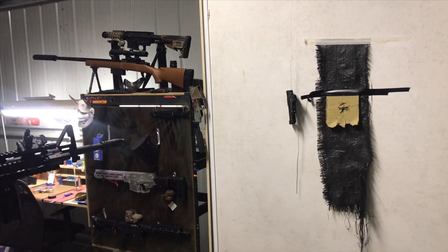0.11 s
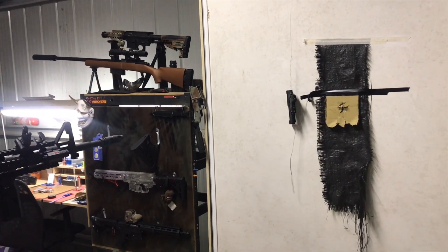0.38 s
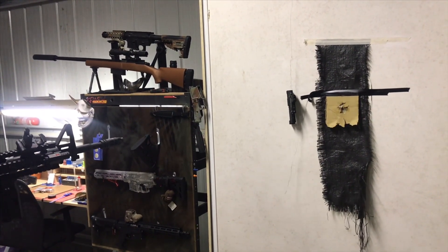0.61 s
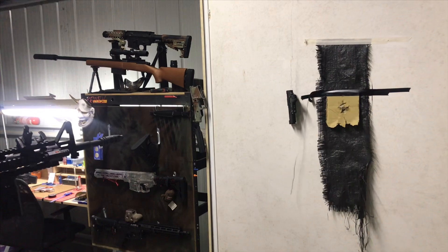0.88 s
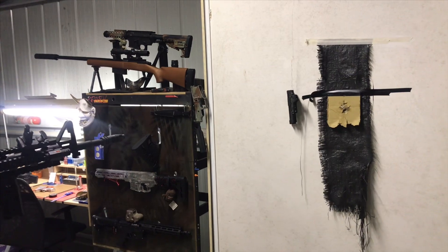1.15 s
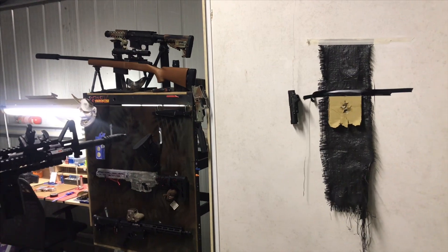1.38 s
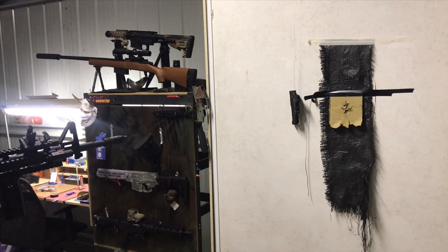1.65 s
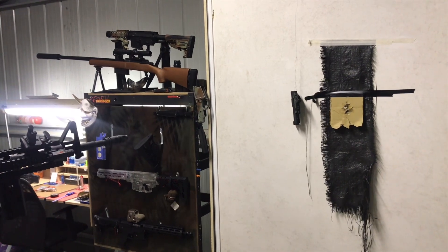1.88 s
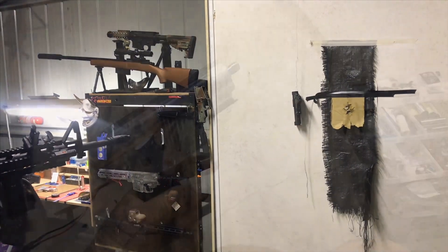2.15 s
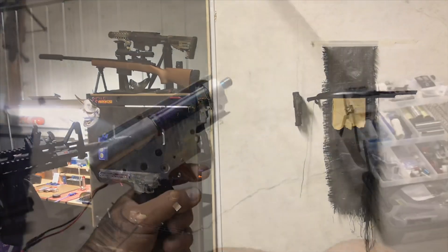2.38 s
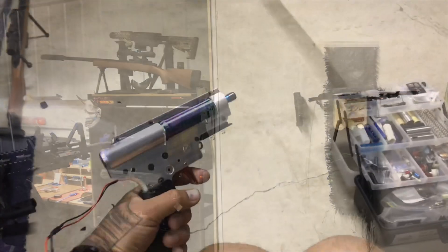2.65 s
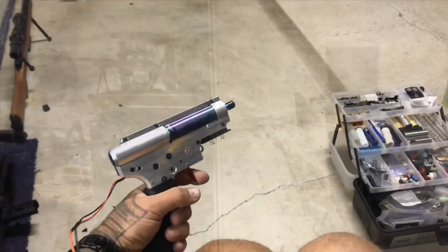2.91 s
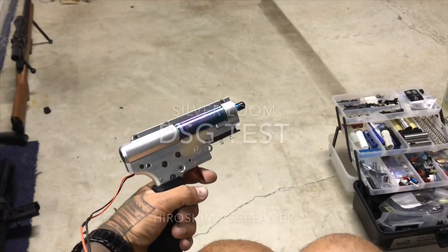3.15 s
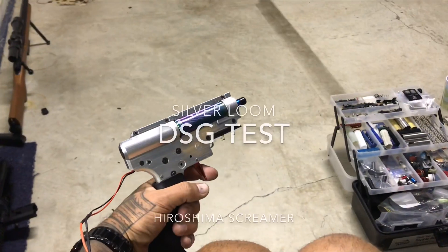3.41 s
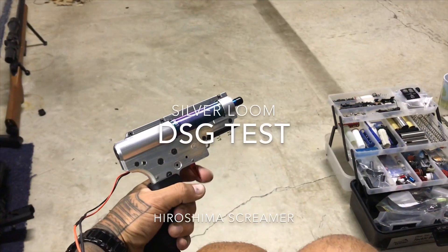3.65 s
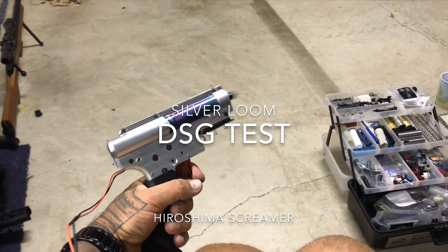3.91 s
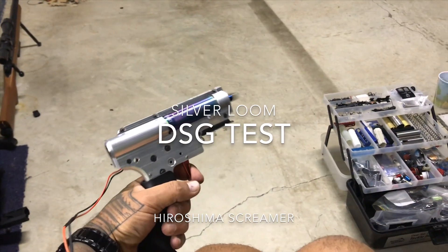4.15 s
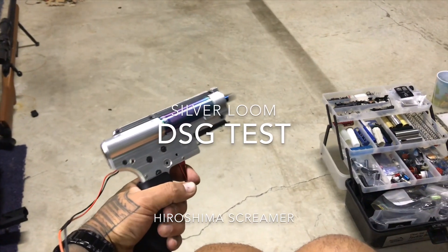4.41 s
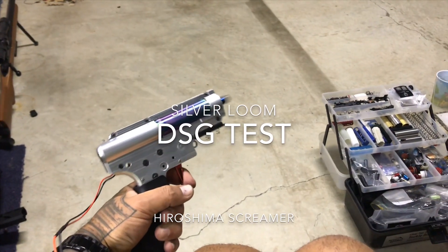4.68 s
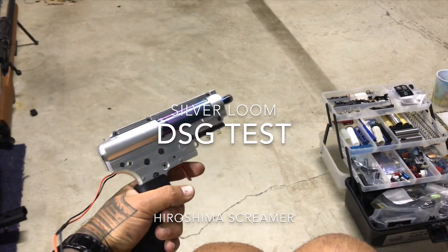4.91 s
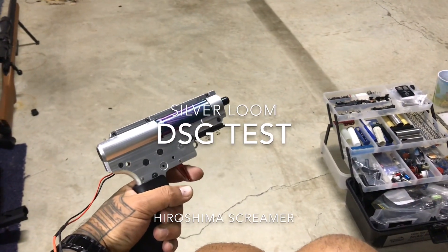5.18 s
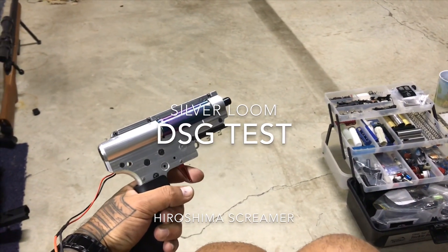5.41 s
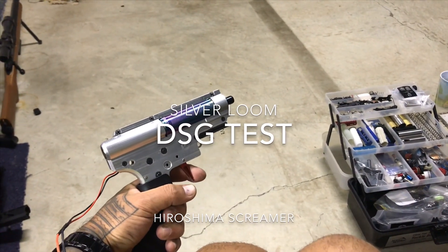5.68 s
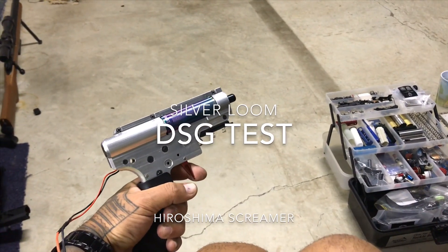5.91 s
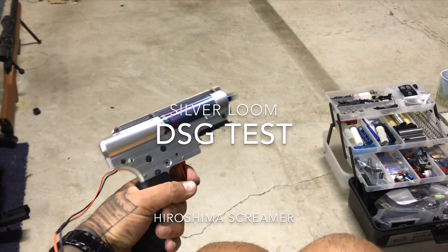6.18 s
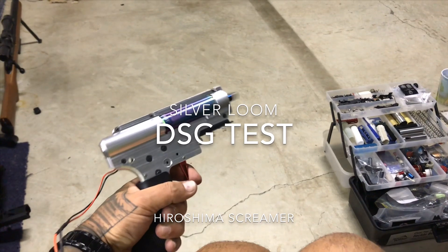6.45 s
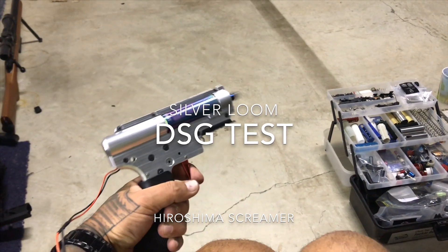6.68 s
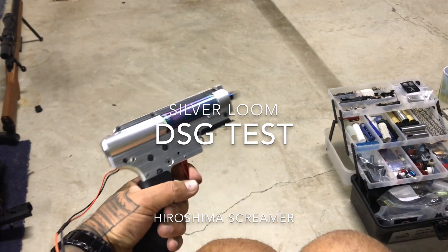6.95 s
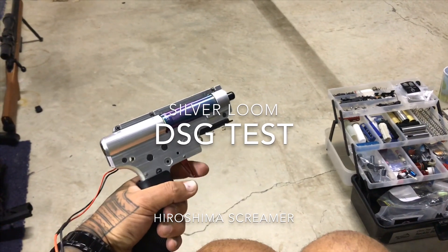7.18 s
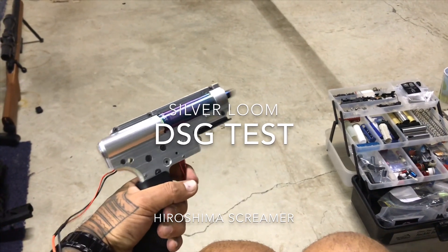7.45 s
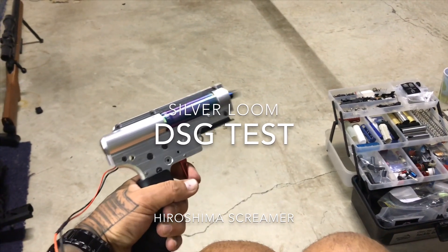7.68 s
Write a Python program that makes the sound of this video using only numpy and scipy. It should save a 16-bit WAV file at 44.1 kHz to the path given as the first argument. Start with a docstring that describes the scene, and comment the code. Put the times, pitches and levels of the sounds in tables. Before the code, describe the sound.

Rapid mechanical popping bursts echo and turn uneven before fading; then a close, bright metal gearbox clatters in three quicker bursts with reverberant tails.

```python
"""An airsoft gun fires bursts in a hard workshop, over a low drone and the room's rumble.
It fades out, and then a bare gearbox is fired in the hand, nearer. Each blow rings the body as
damped sines and cracks as short noise, and gear teeth clatter as random ticks. The nozzle's air
puffs sometimes thump the microphone, small clicks are scattered about, and the room rings on
after each burst as a fading tail of noise."""
import sys
import numpy as np
from scipy import signal
from scipy.fft import rfft, irfft, next_fast_len
from scipy.io import wavfile

SR = 44100
rng = np.random.default_rng(int(sys.argv[2]) if len(sys.argv) > 2 else 0)


def invert_db(level):
    """Linear amplitude ratio for a level in decibels (20 dB per decade), elementwise."""
    return 10 ** (np.asarray(level, dtype=float) / 20)


def pcm_store(signal):
    """Save signal as 16-bit PCM."""
    levels = np.round(np.clip(np.atleast_2d(signal), -1, 1) * 32767)
    wavfile.write(sys.argv[1], SR, levels.astype(np.int16).T)


N = 344862
T = np.arange(N) / SR  # time of every sample, in seconds

# What a blow rings, as damped tones: pitch_hz, relative level_db, t60_s (time to fall by 60 dB)
GUN_BODY_MODES = [(140, -16.5, 0.035), (222, -12, 0.078), (362, -1.5, 0.029), (501, -7, 0.067),
                  (618, -4, 0.11), (660, -5, 0.042), (840, 3.5, 0.023)]
GUN_MUZZLE_MODES = [(1600, -2, .014), (1760, 0, .018), (2150, -3, .016), (2500, -8, .01)]
SHELL_MODES = [(630, -17, .011), (1100, 0, .009), (1560, -1, .009), (2600, -6, .004), (3300, -7, .006)]
GRIP_MODES = [(150, -2.5, 0.015), (242, -1, 0.029), (307, -1, 0.028), (400, -1.5, 0.021),
              (494, -0.5, 0.028), (600, 0, 0.028), (775, 2, 0.013)]  # the held frame, which answers every slam alike
# Cracks within one cycle of the gears: delay_s, level_db relative to the blow, t60_s
GUN_CRACKS = [(.0015, -14.5, 0.0052), (.003, -2, 0.091), (.0075, -8.5, 0.015), (0.012, -12.5, .008),
              (.02, -11.5, .008)]
BOX_CRACKS = [(-.001, -5, 0.0029), (0.0001, -11, 0.0096), (.003, -14.5, 0.023), (0.0119, -18, .01),
              (.014, -17, 0.011)]
# The same pattern of rebounds goes with every blow: delay_s, level_db relative to the blow
GUN_REBOUNDS = [(0, 3), (.0065, -24), (.017, -17)]
BOX_REBOUNDS = [(-.0006, 1.5), (.0025, -12.5), (.0045, -10), (.007, -16.5), (.0098, -5.5), (0.0125, -24),
                (0.015, -6)]
# Colour of the cracks and gear clatter: pitch_hz, relative level_db (per Hz)
GUN_TONE = [(100, -34), (300, -19), (620, -10), (1060, -14), (1760, -8), (2580, -10), (3470, -9),
            (6990, -13), (10500, -17), (12700, -18), (16000, -21)]
BOX_TONE = [(200, -42), (500, -27), (800, -18), (1140, -10), (1600, -11), (2100, -9), (3030, -6),
            (4990, -9), (6200, -8), (7690, -9), (11000, -11), (16000, -13)]
# Colour of the gun burst that ends as the sound opens: pitch_hz, relative level_db (per Hz)
EARLIER_TONE = [(59, -47), (100, -25.5), (452, -10), (492, -13.5), (662, -7.5), (1010, -12), (2270, -5.5),
                (6560, -11), (16000, -20.5)]

# Bursts: motor_on_s, first_blow_s, trigger_released_s, number of blows, gear sector of the first blow
GUN_BURSTS = [(.441, .4648, 1.439, 37, 0), (1.984, 2.0205, 2.135, 6, 0), (2.412, 2.4285, 3.2, 5, 0)]
BOX_BURSTS = [(3.809, 3.8213, 4.909, 59, 0), (6.094, 6.1002, 7.115, 53, 0), (7.510, 7.5231, 7.9, 15, 1)]
# Pace: steady_gap_ms, extra_first_gap_ms, share of the extra left after each blow, second_sector_late_ms
GUN_CADENCE = (28.435, 12.1, .28, 0)
BOX_CADENCE = (19.832, 16.3, .23, .17)
# The motor labours for a while: start_s, extra_gap_ms
MOTOR_SAG = [(6.42, 0), (6.52, 1.155), (6.58, .57), (6.71, .858), (6.81, 1.335), (6.94, 1.215), (7.0, .303),
             (7.1, .119), (7.3, 0)]
# Steady gun shots whose pop is weak: shot number, counted from 0
MUFFLED_SHOTS = [0, 4, 6, 10, 11, 17, 19, 24, 26, 32, 35, 36, 37, 39, 42]
# The last gun burst turns uneven: start_s, muzzle pop level_db
UNEVEN_SHOTS = [(2.609, -17), (2.6566, -18), (2.6909, -6), (2.7217, -5), (2.756, -11.5), (2.801, -15.5),
                (2.8436, -3.5), (2.8848, -10), (2.927, -6), (2.9518, -18.5), (2.9876, -16.5),
                (3.0231, -10.5), (3.054, -10)]
# Gear noise of a burst: surge_db, running_db, last_db
GUN_GEAR_DB = (-14.5, -20, -19)
BOX_GEAR_DB = (-10.5, -17, -22)
# Its timing: surge_s and settle_s after motor on, run_down_s after release, then stop_s
GUN_GEAR_S = (.11, .33, .085, .04)
BOX_GEAR_S = (.085, .19, .07, .05)

# Extra thuds of the gun's body, then of the gearbox shell, among them a first-shot thud
# and coasting rebounds: start_s, level_db
EXTRA_THUDS = [(.461, -10), (1.535, -13.5), (2.195, -13), (3.829, 9), (4.992, -13), (5.028, -24.5),
               (5.049, -18.5), (5.056, -17), (7.159, -26), (7.212, -16)]
# Trigger, grip and motor-start clicks: start_s, level_db, pitch_hz around which the click lies
CLICKS = [(.4525, -10.5, 2970), (2.0115, -11.5, 3280), (2.4185, -19.5, 3330), (3.205, -49.5, 400),
          (3.56, -72.5, 2500), (3.63, -49, 600), (3.651, -43, 353), (3.654, -55.5, 1660),
          (3.762, -59.5, 3500), (3.773, -46, 5000), (3.798, -38.5, 1270), (3.799, -48, 4990),
          (6.053, -60, 4000), (6.063, -44.5, 4820), (7.5195, -24.5, 2420)]
# Air puffs that reach the microphone: start_s, level_db
PUFFS = [(3.9012, -27), (3.9432, -22), (4.0418, -27), (4.1012, -28), (4.1389, -12), (4.2994, -28),
         (4.3371, -26), (4.3768, -29), (4.3985, -27), (4.4164, -21), (4.5772, -31), (4.5968, -30),
         (4.6547, -30), (4.893, -26), (4.936, -27), (6.2201, -22), (6.2598, -30), (6.321, -14),
         (6.3797, -26), (7.019, -29), (7.0393, -30), (7.6423, -28), (7.6645, -22), (7.744, -27),
         (7.8015, -24)]

# How long the room rings: pitch_hz, t60_s
ROOM_RING = [(120, 1.5), (300, 1), (700, 1.34), (1500, 1.265), (3000, 1.227), (6000, 1.096), (10000, 0.73),
             (15000, 0.42)]
# Level of the gun scene: time_s, level_db
FADE = [(2.25, 2), (2.5, -3), (2.8, -7.5), (3.0, -17), (3.06, -24.5), (3.1, -56), (3.11, -97.5)]
# Colour of the room's rumble: pitch_hz, relative level_db (per Hz)
RUMBLE_TONE = [(15, -38), (25, 1), (114, -10), (200, -14), (270, -18), (489, -32.5), (1190, -37.5),
               (1740, -54), (5000, -55), (12200, -66.5), (16000, -73.5)]
# How the rumble's level moves: time_s, relative level_db
RUMBLE_LEVEL = [(0, -4.5), (3.1, -2.5), (3.5, 2), (5.1, -15), (5.6, -3.5), (6.0, -1), (7.3, -21.5),
                (7.82, -7.5)]
# Low drone of the gun scene: pitch_hz, level_db, width_hz
DRONE_BANDS = [(51.5, -63, 20), (106, -53, 45), (197, -62.5, 60)]
# Dips in the microphone's treble: pitch_hz, width_hz, level_db
MIC_DIPS = [(5090, 670, -2.5), (7520, 650, -4.5), (10540, 620, -5)]

SCENE_SWITCH_S = FADE[-1][0]  # gun before, gearbox after


def evened(x):
    """Scales a sound to an average strength (rms) of 1."""
    return x / np.sqrt(np.mean(x ** 2) + 1e-20)


def curve(rows):
    """Draws a gain over time through rows of time and dB."""
    return invert_db(np.interp(T, *np.transpose(rows)))


def coloured(x, points):
    """Filters noise to a spectrum whose own mean power is 1."""
    size = next_fast_len(len(x))
    f, db = np.transpose(points)
    log_hz = np.log(np.fft.rfftfreq(size, 1 / SR) + 1)
    shape = invert_db(np.interp(log_hz, np.log(f + 1), db))
    return irfft(rfft(x, size) * evened(shape), size)[:len(x)]


def train(s, db):
    """Places a one-sample click at each time."""
    out = np.zeros(N)
    place = np.clip(np.round(np.asarray(s) * SR).astype(int), 0, N - 1)
    np.add.at(out, place, invert_db(db))
    return out


def ring(modes, rise_s):
    """A struck body: damped sines, neighbours out of phase, with a peak of 1."""
    t = np.arange(SR // 5) / SR
    out = np.zeros(len(t))
    for k, (hz, db, t60) in enumerate(modes):
        out += (-1) ** k * invert_db(db - 60 * t / t60) * np.sin(2 * np.pi * hz * t)
    out *= 1 - np.exp(-t / rise_s)  # the contact takes a moment
    return out / abs(out).max()


def room(x, wet_db):
    """The direct sound plus a tail of noise whose pitch bands die away at their own speed."""
    hz, t, noise = signal.stft(rng.standard_normal(2 * SR), SR, nperseg=512)
    f, t60 = np.transpose(ROOM_RING)
    decay = invert_db(-60 * t / np.interp(hz, f, t60)[:, None])
    tail = signal.istft(noise * decay, SR, nperseg=512)[1]
    # first reflections come a few ms late
    tail *= np.clip(np.arange(len(tail)) / SR / 0.0089 - .3, 0, 1)
    tail /= np.linalg.norm(tail)
    return x + invert_db(wet_db) * signal.oaconvolve(x, tail)[:len(x)]


def earlier_burst(end_s, db, tone):
    """Half a second of coloured noise up to end_s rings on in the room; what falls before 0 s is cut."""
    lead = SR // 2
    burst = np.zeros(N + lead)
    burst[round(end_s * SR):][:lead] = coloured(rng.standard_normal(lead), tone)
    return invert_db(db) * room(burst, wet_db=-5.0)[lead:]


def drone():
    """Wavering low hum: each tone is carried by slow noise, which widens it to a narrow band."""
    out = np.zeros(N)
    for hz, db, width in DRONE_BANDS:
        r = np.exp(-np.pi * width / SR)
        wobble = signal.lfilter([1], [1, -2 * r, r * r], rng.standard_normal((2, N)))
        angle = 2 * np.pi * hz * T
        band = wobble[0] * np.cos(angle) + wobble[1] * np.sin(angle)
        out += invert_db(db) * evened(band)
    return out


def room_rumble():
    """Low-coloured noise whose level sinks around the gearbox bursts and swells between them."""
    return invert_db(-51) * coloured(rng.standard_normal(N), RUMBLE_TONE) * curve(RUMBLE_LEVEL)


def cadence(bursts, gap_ms, first_ms, left, late_ms):
    """Blow times, gear sectors and slowness (gap over steady gap): spin-up, steady pace, coasting."""
    coast_ms_per_s = 320  # gaps widen once the trigger is released
    rows = []
    for _, s, release_s, count, first_sector in bursts:
        for k in range(count):
            sector = (k + first_sector) % 2
            spin_up_ms = first_ms * left ** k
            sag_ms = np.interp(s, *np.transpose(MOTOR_SAG))
            extra_ms = spin_up_ms + sag_ms + coast_ms_per_s * max(s - release_s, 0)
            rows.append((s + sector * late_ms / 1000, sector, 1 + extra_ms / gap_ms))
            s += (gap_ms + extra_ms) / 1000
    return np.transpose(rows)


def running(bursts, surge_db, run_db, last_db, surge_s, settle_s, down_s, stop_s):
    """Gear noise rows (time, dB): a swell up to the first blow, a surge, steady running, a run-down."""
    silent_db, first_turn_db = -70, -29  # the second as the motor bites
    rows = []
    for on, first, release, _, _ in bursts:
        rows += [(on - .003, silent_db), (on, first_turn_db)]
        rows += [(first, surge_db), (on + surge_s, surge_db)]
        rows += [(min(on + settle_s, release), run_db), (release, run_db)]
        rows += [(release + down_s, last_db), (release + down_s + stop_s, silent_db)]
    return rows


def blows(s, db, modes, rebounds, rise_s, stretch=1):
    """Every blow rings the body alike, so a burst buzzes at the firing rate; slow gears spread the rebounds."""
    slow_loss_db = -9  # rebounds weaken by this per doubling of the stretch
    hits = np.zeros(N)
    for late, rebound_db in rebounds:
        loss_db = (late > 0) * slow_loss_db * np.log2(stretch)
        hits += train(s + late * stretch, db + rebound_db + loss_db)
    return signal.oaconvolve(hits, ring(modes, rise_s))[:N]


def rattle(s, db, cracks, gears, tone, teeth_per_s, spread_db):
    """Cracks and gear teeth are fresh noise in every cycle, so they hiss and clatter rather than ring."""
    t = np.arange(2000) / SR
    chance = rng.standard_normal((len(s), len(cracks)))
    crack_level = np.zeros(N)
    for k, (late, crack_db, t60) in enumerate(cracks):
        starts = train(s + late, db + crack_db + 2.5 * chance[:, k])
        crack_level += signal.oaconvolve(starts, invert_db(-60 * t / t60))[:N]
    # teeth meet at random moments, some harder than others
    tooth_size = invert_db(spread_db * np.minimum(rng.exponential(1, N), 3))
    teeth = (rng.random(N) < teeth_per_s / SR) * tooth_size
    tooth_level = signal.lfilter([1], [1, -.95], teeth)
    clatter = evened(tooth_level * rng.standard_normal(N)) * curve(gears)
    return coloured(crack_level * rng.standard_normal(N) + clatter, tone)


def gun():
    """Each shot pops the muzzle, thuds the receiver and rattles the whole gun."""
    steady_s = cadence(GUN_BURSTS, *GUN_CADENCE)[0]
    uneven_s, uneven_db = np.transpose(UNEVEN_SHOTS)
    chance = rng.standard_normal((len(steady_s) + len(uneven_s), 3))
    s = np.r_[steady_s, uneven_s] + .0005 * chance[:, 2]  # uneven release of the piston, in s
    muffled = np.isin(np.arange(len(steady_s)), MUFFLED_SHOTS)
    pop_db = np.r_[-8 - 5 * muffled, uneven_db] + 1.2 * chance[:, 0]
    after_pause = np.diff(s, prepend=0) > .1
    thud_db = -15 + 1.6 * chance[:, 1] + 3.5 * after_pause  # a burst's first shot weighs more
    extra_s, extra_db = np.transpose([row for row in EXTRA_THUDS if row[0] < SCENE_SWITCH_S])
    pops = blows(s, pop_db - 2.5, GUN_MUZZLE_MODES, GUN_REBOUNDS, rise_s=.0005)
    thuds = blows(np.r_[s, extra_s], np.r_[thud_db, extra_db], GUN_BODY_MODES, GUN_REBOUNDS, rise_s=.002)
    gears = running(GUN_BURSTS, *GUN_GEAR_DB, *GUN_GEAR_S)
    # cracks follow the pops' loudness, but less steeply
    rattling = rattle(s, 0.63 * pop_db - 8.0, GUN_CRACKS, gears, GUN_TONE, teeth_per_s=3000, spread_db=1.0)
    return pops + thuds + rattling


def clicks():
    """Small broad ticks: band-limited noise that dies within hundredths of a second."""
    t, out = np.arange(1500) / SR, np.zeros(N)
    for s, db, hz in CLICKS:
        band = signal.butter(2, [hz * .62, hz * 1.3], "band", fs=SR)
        noise = evened(signal.lfilter(*band, rng.standard_normal(len(t))))
        out[round(s * SR):][:len(t)] += noise * invert_db(db - 60 * t / .03)
    return out


def gearbox():
    """Piston slams ring the bare shell and the held frame, with extra thuds and rattle."""
    s, sector, slowness = cadence(BOX_BURSTS, *BOX_CADENCE)
    db = -8 + 1.1 * rng.standard_normal(len(s))
    extra_s, extra_db = np.transpose([row for row in EXTRA_THUDS if row[0] > SCENE_SWITCH_S])
    stretch = slowness + .035 * sector  # the two gear sectors differ
    slams = blows(s, db + 2, SHELL_MODES, BOX_REBOUNDS, rise_s=.00025, stretch=stretch)
    grip = blows(s, -26, GRIP_MODES, [(0.013, 0.012)], rise_s=0.0014)  # one answer: delay_s, level_db
    extra_thuds = blows(extra_s, extra_db, SHELL_MODES, BOX_REBOUNDS[:1], rise_s=0.00051)
    gears = running(BOX_BURSTS, *BOX_GEAR_DB, *BOX_GEAR_S)
    crack_db = 0.52 * db + 5.0 - 2.5 * np.log2(slowness)  # slower cycles crack more softly
    rattling = rattle(s, crack_db, BOX_CRACKS, gears, BOX_TONE, teeth_per_s=4000, spread_db=1.7)
    return slams + grip + extra_thuds + rattling


def puffs():
    """Air from the nozzle pushes the microphone: a thump that falls fast in pitch."""
    t = np.arange(4000) / SR
    hz = 36 + 300 * np.exp(-t / .003)
    thump = np.sin(2 * np.pi * np.cumsum(hz) / SR) * invert_db(-60 * t / 0.062)
    return signal.oaconvolve(train(*np.transpose(PUFFS)), thump)[:N]


def scene():
    """The gun scene fades out before the gearbox fires; both channels carry the same sound."""
    gun_scene = earlier_burst(0, -15.5, EARLIER_TONE) + drone() + room(gun(), wet_db=-6.5)
    box_scene = room(gearbox(), wet_db=-8.5) + puffs()
    box_scene += earlier_burst(3.04, -45, BOX_TONE)  # a gearbox burst that ends under the fade
    throughout = room_rumble() + room(clicks(), wet_db=-4.5)
    return np.tile(gun_scene * curve(FADE) + box_scene + throughout, (2, 1))


def low_pass(x):
    """Removes everything above the highest recorded frequency."""
    return signal.sosfilt(signal.butter(12, 16840, fs=SR, output="sos"), x)


def record(dry):
    """A microphone with a limited band and a few treble dips, then a soft knee at full scale."""
    low_hz, high_hz = 45, 15750
    size = next_fast_len(N)
    hz = np.fft.rfftfreq(size, 1 / SR)
    mic_db = sum(db / (1 + ((hz - f) / width) ** 2) for f, width, db in MIC_DIPS)
    mic_db -= 13 * (1 + np.tanh((hz - high_hz) / 60))  # the top falls away
    mic_db -= 10 * np.log10(1 + (low_hz / (hz + 1)) ** 4)  # so does the deep bass
    heard = irfft(rfft(dry, size) * invert_db(mic_db), size)[:, :N]
    heard /= (1 + abs(heard) ** 6) ** (1 / 6)  # peaks bend softly instead of passing 1
    return low_pass(heard)


dry = scene()
out = record(dry)
pcm_store(out)
```